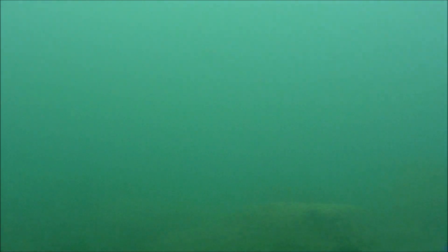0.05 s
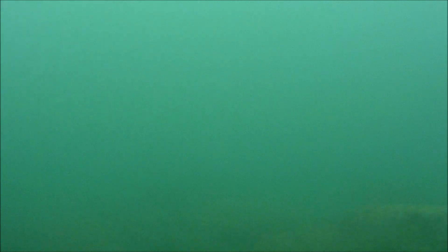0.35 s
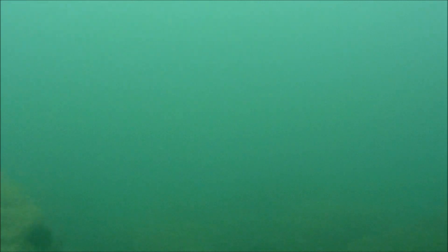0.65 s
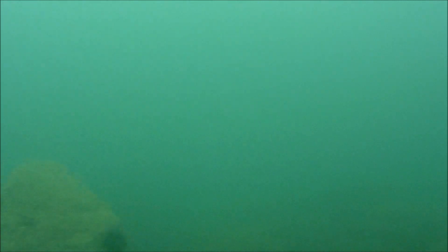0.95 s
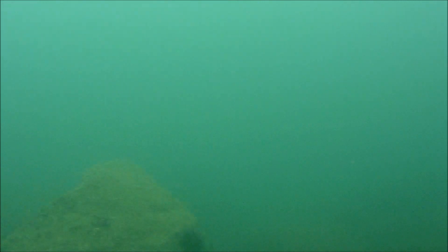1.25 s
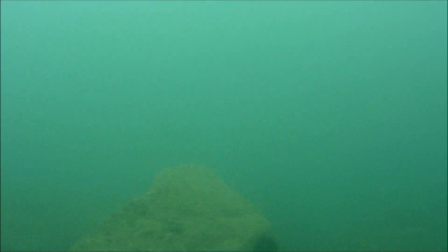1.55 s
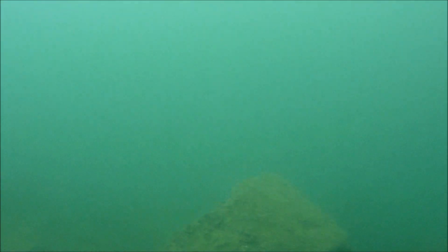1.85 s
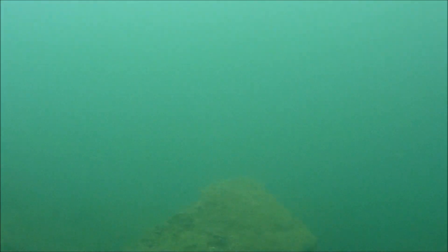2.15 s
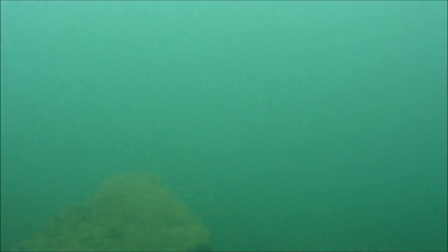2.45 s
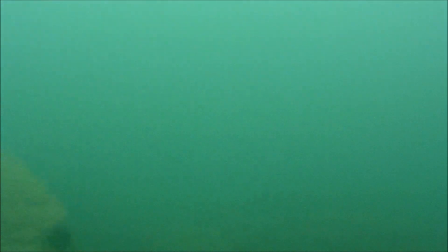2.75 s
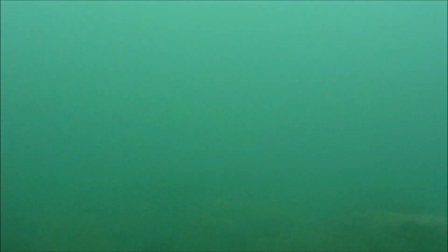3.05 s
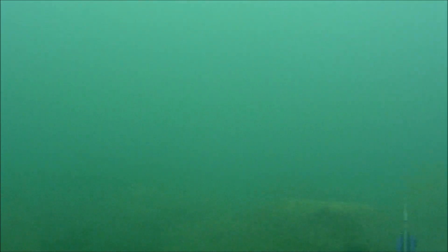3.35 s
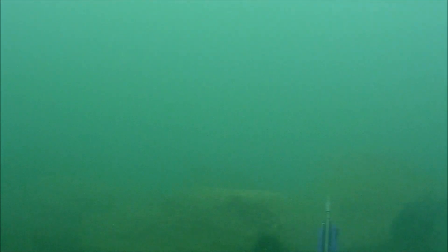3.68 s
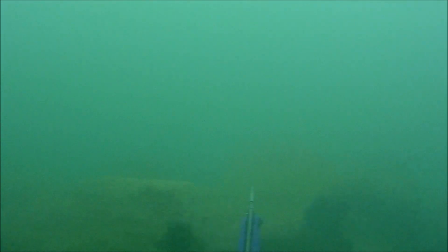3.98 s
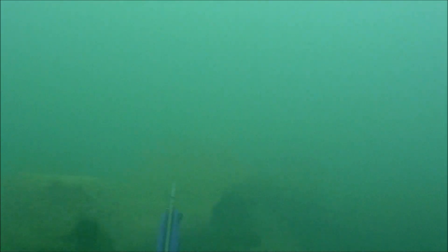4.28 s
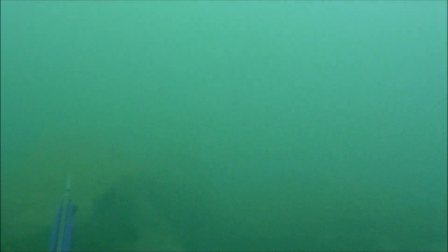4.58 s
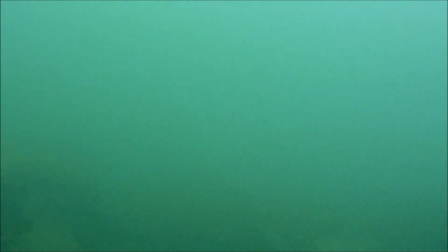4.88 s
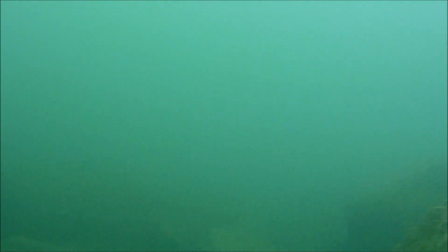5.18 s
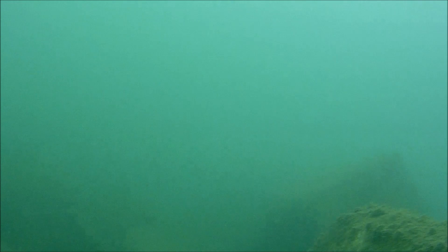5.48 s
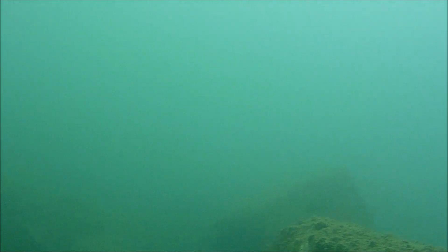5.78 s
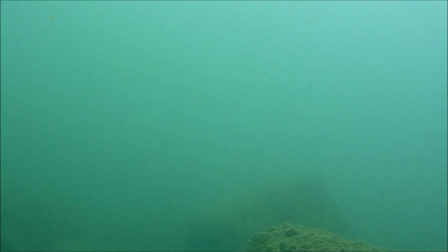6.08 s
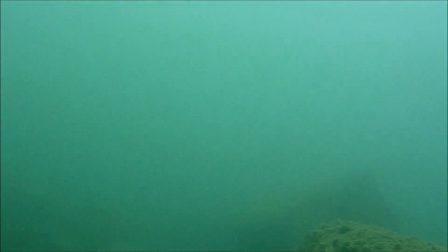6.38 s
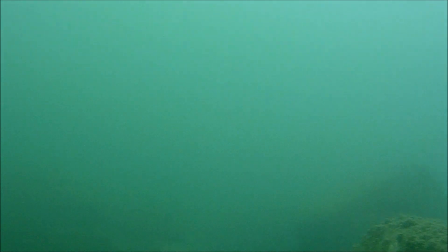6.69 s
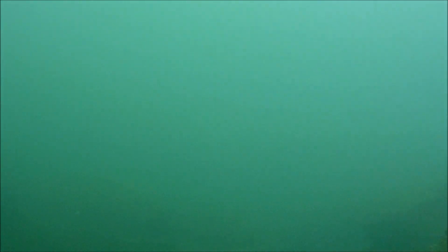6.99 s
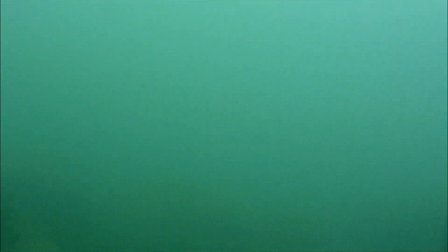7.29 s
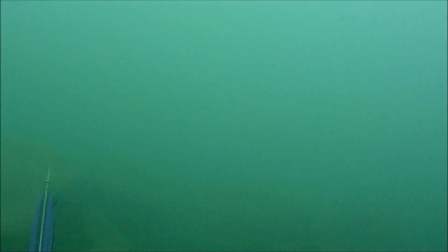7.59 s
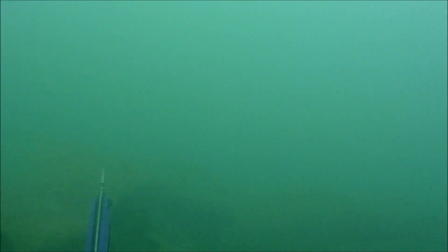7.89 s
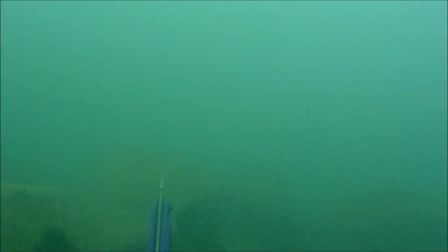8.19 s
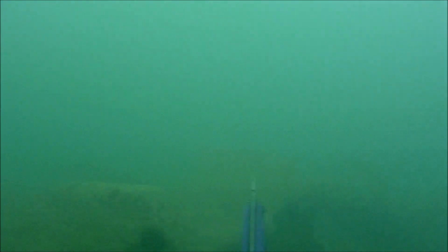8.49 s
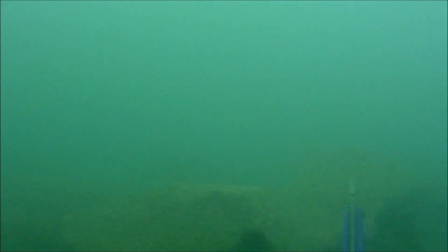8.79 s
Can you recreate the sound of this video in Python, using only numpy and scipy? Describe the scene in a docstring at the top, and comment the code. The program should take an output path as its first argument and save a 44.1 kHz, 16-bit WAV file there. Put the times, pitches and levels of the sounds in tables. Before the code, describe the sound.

Heard from a camera in a waterproof housing, quiet shrimp-like clicks crackle throughout over a low underwater wash and faint rumble. Much louder dull thumps, each dropping in pitch, swell in a quick, even run, pause for about three seconds, then return at full strength. Short, hard knocks on the housing come around the middle and just before the end.

```python
"""Dull thumps grow out of a low, steady wash, under water near a rocky bottom. They come in two runs,
about four a second, each a short pulse of tone that falls in pitch. Sharp snaps, likely shrimp, crackle
near and far, scatter off the rocks and excite the resonances of a waterproof camera housing.
A few hard knocks ring its wall; beneath lie soft bumps of water and the rumble of flow round the camera."""
import sys
import numpy as np
from scipy import signal
from scipy.fft import rfft, irfft, next_fast_len
from scipy.io import wavfile
from scipy.ndimage import map_coordinates

SR = 44100
rng = np.random.default_rng(int(sys.argv[2]) if len(sys.argv) > 2 else 0)


def log_audio(samples):
    """Write samples as a 16-bit WAV file to the path given in sys.argv[1]."""
    # one column per channel
    frames = np.atleast_2d(samples).T
    # limit to full scale, then quantise
    limited = np.clip(frames, -1, 1)
    pcm = np.round(limited * 32767).astype(np.int16)
    wavfile.write(sys.argv[1], SR, pcm)


N = 389844
TOP_HZ = 15950


def amp(db):
    """Amplitude ratio of a level in decibels."""
    return 10 ** (np.asarray(db) / 20)


def unit(x):
    """Normalisation to rms 1."""
    return x / np.sqrt(np.mean(x ** 2) + 1e-20)


def along(points, hz):
    """Interpolation of (f/Hz, level/dB) points on a logarithmic frequency axis."""
    f, db = np.transpose(points)
    return np.interp(np.log(hz + 1), np.log(f + 1), db)


def wobble(rate):
    """Smooth random modulation: a spline with `rate` knots a second."""
    return map_coordinates(rng.standard_normal(int(N * rate / SR) + 4), [np.arange(N) * rate / SR])


def coloured(x, level):
    """Minimum-phase filtering of x, with a gain in dB of level(hz)."""
    m = 2 * next_fast_len(len(x))
    cepstrum = irfft(np.log(amp(level(np.fft.rfftfreq(m, 1 / SR)))), m)
    cepstrum[1:m // 2] *= 2
    cepstrum[m // 2 + 1:] = 0
    return irfft(rfft(x, m) * np.exp(rfft(cepstrum)), m)[:len(x)]


def add(track, s, sound):
    """Superposition of a sound on the track from time s."""
    part = track[max(round(s * SR), 0):][:len(sound)]
    part += sound[:len(part)]


# envelope of the rumble, before its gain: t/s, level/dB
RUMBLE_LEVEL = [(0.0, -63.5), (2.54, -59), (2.56, -61), (5.12, -65), (5.44, -55.5), (8.03, -50),
                (8.13, -63), (8.84, -62)]

def rumble(gain_db=-1.0, band_hz=(14, 38)):
    """Flow noise: water passing round the moving camera gives a deep rumble."""
    s, db = np.transpose(RUMBLE_LEVEL)
    bandpass = signal.butter(2, band_hz, "band", fs=SR, output="sos")
    deep = signal.sosfilt(bandpass, rng.standard_normal(N))
    return unit(deep) * amp(np.interp(np.arange(N) / SR, s, db) + gain_db)


# spectrum of the wash: f/Hz, relative level/dB
WASH_SPECTRUM = [(10, -16), (28, -21), (55, -1), (110, -1), (250, -1), (500, -4), (1000, -11),
                 (2000, -21.5), (4000, -38.5), (16000, -59)]

def wash(level_db=-51.5):
    """Ambient noise: the water's steady wash, strongest at low frequencies."""
    noise = unit(coloured(rng.standard_normal(N), lambda hz: along(WASH_SPECTRUM, hz)))
    return noise * amp(level_db + 0.34 * wobble(12.0))


# resonances of the housing: f/Hz, bandwidth/Hz, gain/dB
HOUSING_RESONANCES = [(2390, 98, 3.5), (2772, 100, 10.5), (2966, 177, 7.5), (3554, 486, 15), (4300, 34, 5),
                      (4632, 280, 13.5), (5320, 75, 8), (5790, 125, 9.5), (6224, 240, 9), (7520, 180, 8),
                      (9150, 270, 6.5), (10600, 530, 3.5), (12800, 520, 5)]

def housing(hz):
    """Resonance: the housing's gain in dB, a sum of Lorentzian peaks."""
    return sum(db / (1 + (2 * (hz - centre) / width) ** 2) for centre, width, db in HOUSING_RESONANCES)


# spectrum of the fizz: f/Hz, relative level/dB
FIZZ_SPECTRUM = [(300, -26.5), (1300, 2.5), (2400, 1), (4000, -3.5), (7000, -6), (10000, -5.5),
                 (12000, -9.5), (16000, -13)]
# envelope of the fizz: t/s, level/dB
FIZZ_ENVELOPE = [(0, -60), (1.8, -59.5), (3.7, -59.5), (5, -62.5), (6.4, -62), (8, -61), (8.84, -59)]

def fizz():
    """Incoherent summation: the most distant snaps merge into a flickering noise."""
    db = np.interp(np.arange(N) / SR, *np.transpose(FIZZ_ENVELOPE))
    noise = coloured(rng.standard_normal(N), lambda hz: along(FIZZ_SPECTRUM, hz) + 0.65 * housing(hz))
    return unit(noise) * amp(db + 0.98 * wobble(68))


# soft pushes of water: t/s, envelope peak level/dB
WATER_BUMPS = [(2.923, -36), (3.297, -37.5), (3.346, -42), (3.983, -42.5), (6.925, -42), (7.853, -40)]

def bumps(hz=92, width_s=0.0057):
    """Pressure pulses: each push of water is a Gaussian wave packet about one cycle long."""
    out, t = np.zeros(N), np.arange(-SR // 20, SR // 20) / SR
    envelope = np.exp(-(t / width_s) ** 2)
    for s, db in WATER_BUMPS:
        add(out, s + t[0], amp(db) * envelope * np.cos(2 * np.pi * (hz * t + rng.random())))
    return out


# source spectrum of a snap: f/Hz, relative level/dB
CRACK_SPECTRUM = [(100, -5), (900, -23.5), (1250, -6.5), (1900, -4), (2400, 4.5), (4000, -1.5),
                  (7000, -7.5), (9600, -8), (12000, -15.5), (16000, -23)]

def snap(tilt_db, decay_s, scatter_s=0.017):
    """Multipath propagation: a crack and its duller scatter off the rocks, heard through the housing."""
    t = np.arange(SR // 12) / SR
    octaves = lambda hz: np.log2(np.clip(hz, 2600, 9500) / 2600)
    direct, scatter = rng.standard_normal((2, len(t))) * (1 - np.exp(-t / .0005))
    direct = direct * np.exp(-t / decay_s)
    # a longer crack holds more energy, so more of it comes back from the rocks
    scatter = scatter * np.exp(-t / scatter_s) * np.sqrt(decay_s / 0.00071)
    scatter = coloured(scatter, lambda hz: -18 - 3 * octaves(hz))
    top_db = -2 - 8 * min(decay_s / 0.0071, 1)  # drawn-out cracks lose the very top
    muffle = lambda hz: top_db * np.clip((hz - 10000) / 2000, 0, 1)
    spectrum = lambda hz: along(CRACK_SPECTRUM, hz) + housing(hz) + tilt_db * octaves(hz) + muffle(hz)
    return coloured(direct + scatter, spectrum)


def water_path(crack, ripple_db):
    """Transmission: each path colours a crack unevenly; scaled to the energy of 10 ms at rms 1."""
    ripple = ripple_db * rng.standard_normal(20)
    heard = coloured(crack, lambda hz: np.interp(hz, np.linspace(0, TOP_HZ, len(ripple)), ripple))
    return heard * np.sqrt(SR / 100 / np.sum(heard ** 2))


def far_snaps(floor_db=-61, spread_db=2.5, max_rise_db=6, count=400):
    """A random point process: weak snaps from all over the bottom; the nearer, the rarer."""
    out = np.zeros(N)
    for when, nearness, brightness in rng.random((count, 3)):
        db = floor_db + min(-spread_db * np.log(1 - nearness), max_rise_db)
        crack = snap(tilt_db=-4 + 14 * brightness, decay_s=0.0025)
        add(out, when * N / SR, amp(db) * water_path(crack, ripple_db=6.0))
    return out


# near snaps: t/s, level over 10 ms/dB, relative treble tilt/(dB per octave), decay time/s
NEAR_SNAPS = [(.2922, -48, -3, 0.0049), (.4576, -50, 2, .004), (0.776, -43.5, 11, .007),
              (.8425, -44.5, -5, 0.0034), (1.446, -42, -2.5, 0.0012), (1.665, -47, -9, 0.019),
              (1.8236, -42.5, 9, 0.0025), (2.013, -50, 8, .004), (2.264, -40.5, 5, 0.015),
              (2.9663, -45, -4, 0.011), (3.042, -38, 0, 0.0031), (3.221, -54, 3, 0.0033),
              (3.256, -42.5, 11, .001), (3.3123, -46, 14.5, 0.0012), (3.5408, -40, -4, .003),
              (3.597, -43, 5, 0.0047), (3.67, -49.5, -9, 0.0042), (3.9853, -40, -5.5, .005),
              (4.361, -42.5, 1.5, 0.01), (4.486, -44.5, 5.5, 0.0022), (4.6527, -34, 1.5, 0.017),
              (4.671, -45.5, 8.5, 0.0085), (4.732, -45, 2, 0.0019), (4.769, -46, 3, .003),
              (4.8141, -36.5, -2.5, 0.0045), (4.8257, -33.5, -3, 0.0042), (5.177, -47, 5, 0.0048),
              (5.3847, -31, -1, 0.012), (5.403, -37, -0.5, .003), (5.407, -33.5, 9, 0.01),
              (5.5776, -50.5, -3, .006), (5.9176, -47, 1, 0.0037), (6.043, -48, 3, 0.0016),
              (6.108, -51.5, 16, 0.0027), (6.362, -42, 4, 0.0021), (6.4302, -43.5, -5.5, 0.014),
              (6.878, -47, 5.5, 0.0045), (6.976, -47.5, 13, 0.0029), (7.108, -44.5, 10.5, 0.0025),
              (7.1775, -50.5, 6, .003), (7.276, -43, 18, 0.0031), (7.559, -39, 6, 0.0026),
              (7.6945, -41.5, 16.5, 0.0038), (8.0445, -32.5, 0, 0.006), (8.184, -34.5, 11.5, 0.0026),
              (8.235, -47.5, 2, 0.004), (8.354, -44, -2.5, 0.0013), (8.445, -47, 2.5, 0.012),
              (8.654, -47, 19, 0.031), (8.7102, -33, 3, .006)]

def near_snaps(base_tilt_db=1):
    """Broadband transients: snaps close enough to stand out one by one."""
    out = np.zeros(N)
    for s, db, tilt_db, decay_s in NEAR_SNAPS:
        crack = snap(base_tilt_db + tilt_db, decay_s)
        add(out, s, amp(db) * water_path(crack, ripple_db=3.5))
    return out


# modes of the housing wall: f/Hz, relative level/dB, T60 before the water's damping/s
WALL_MODES = [(1206, -12, 0.1), (1324, -15.5, 0.076), (1614, -5, 0.037), (1870, -6.5, 0.058),
              (2204, -3.5, 0.077), (2530, 7, 0.029), (2657, 0, 0.11), (2847, -0.5, 0.087), (2945, 3, 0.065),
              (3260, -27, .04), (3670, -11.5, 0.06), (3590, -2, .04), (6470, -11, 0.039), (6030, -22, 0.05),
              (8740, -4, .03)]
# hard knocks close to the camera: t/s, peak level/dB
HARD_KNOCKS = [(4.8166, -24), (4.826, -29), (5.385, -23), (8.7101, -16), (8.7145, -24), (8.7225, -24.5)]

def knocks(linger=0.66, damp_s=0.0031, rise_s=0.0015):
    """Damped modal vibration: each knock rings the wall differently; water damps most of it at once."""
    out, t = np.zeros(N), np.arange(SR // 5) / SR
    envelope = (1 - np.exp(-t / rise_s)) * (linger + np.exp(-t / damp_s))
    for s, db in HARD_KNOCKS:
        ring = np.zeros(len(t))
        for hz, level, t60 in WALL_MODES:
            decay = amp(level + rng.normal(0, 3.9) - 60 * t / t60)
            ring += decay * np.sin(2 * np.pi * (hz * rng.normal(1, 0.016) * t + rng.random()))
        ring *= envelope
        add(out, s, amp(db) * ring / np.abs(ring).max())
    return out


def partial(hz):
    """A sinusoid of random starting phase; phase is the time integral of frequency."""
    return np.sin(2 * np.pi * (np.cumsum(hz) / SR + rng.random()))


# upper resonances, fading from the first thumps to the last: t/s, level re the main tone/dB
HOLLOW_LEVEL = [(.5, -19), (2.4, -20), (5.4, -31), (8, -43)]
# thumps at their crests: t/s, main tone level/dB, f/Hz, decay time/s
THUMP_CRESTS = [(.217, -37, 250, 0.0063), (0.499, -23, 206.2, 0.0066), (.515, -25, 166.4, 0.013),
                (0.816, -16, 136.8, 0.013), (1.087, -15, 136.8, 0.012), (1.347, -12, 138, .013),
                (1.602, -13.5, 141.3, 0.014), (1.888, -10, 139, 0.015), (2.145, -8, 142.7, .017),
                (2.445, -6.5, 146.2, .018), (4.588, -32, 114, 0.0071), (5.396, -8, 148, 0.013),
                (5.616, -10.5, 145.7, 0.011), (5.856, -10.5, 148.5, 0.012), (6.093, -14.5, 136.8, 0.011),
                (6.345, -14.3, 153.8, 0.012), (6.573, -7.5, 143.8, 0.012), (6.79, -11.5, 145.4, .010),
                (7.037, -7.5, 147.8, 0.01), (7.248, -8, 146.1, 0.013), (7.486, -7.7, 145.6, 0.012),
                (7.731, -9.5, 146.3, 0.013), (7.966, -7, 143.3, 0.012)]

def thumps(drop_octaves=0.4144, sag_octaves=0.076, waver=0.048, upper_hz=(255, 335),
           kick_hz=170, kick_s=0.0041, ring_hz=105, ring_s=0.044):
    """Frequency-modulated pulses: a small kick, a swell while the pitch drops, a faint low ring."""
    out, t = np.zeros(N), np.arange(-SR // 10, SR // 5) / SR
    before, after = np.maximum(-t, 0), np.maximum(t, 0)
    ring = amp(-38) * np.exp(-after / ring_s) * np.sin(2 * np.pi * ring_hz * after)
    for s, db, hz, decay_s in THUMP_CRESTS:
        drift = 1 + waver * map_coordinates(rng.standard_normal(80), [(t - t[0]) * 200])
        progress = np.clip(t / decay_s, -1.02, 1.02)  # the pitch only slides while the push lasts
        swell = np.exp(-(before / (1.034 * decay_s)) ** 2.12 - (after / decay_s) ** 1.48)
        # two weaker, steadier upper resonances make the thump hollow
        sag = drift * 2 ** (-sag_octaves * progress)
        upper = partial(upper_hz[0] * sag) + amp(-9) * partial(upper_hz[1] * sag)
        hollow = amp(np.interp(s, *np.transpose(HOLLOW_LEVEL)))
        tone = partial(hz * drift * 2 ** (-drop_octaves * progress)) + hollow * upper
        kick = amp(-16) * np.exp(-((t + 1.3 * decay_s) / kick_s) ** 2) * partial(kick_hz * drift)
        add(out, s + t[0], amp(db) * (kick + swell * tone + ring))
    return out


def scene():
    """Linear superposition of all sources at one microphone."""
    return (thumps() + bumps() + near_snaps() + far_snaps() + knocks() + wash() + fizz() + rumble())[None]


def record(dry):
    """Band limiting: the camera passes nothing above TOP_HZ."""
    m = next_fast_len(N + SR // 2)
    passband = np.fft.rfftfreq(m, 1 / SR) < TOP_HZ
    return irfft(rfft(dry, m) * passband, m)[..., :N]


dry = scene()
out = record(dry)
log_audio(out)
```